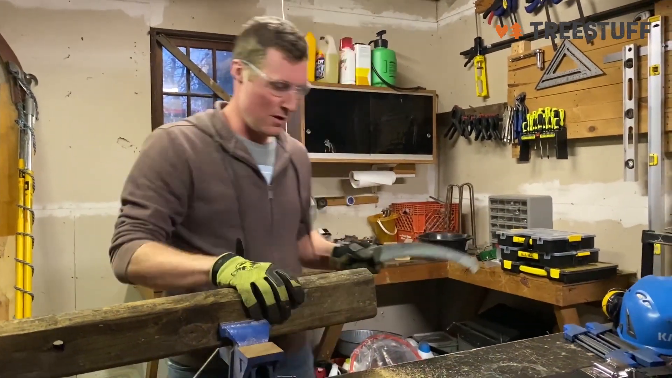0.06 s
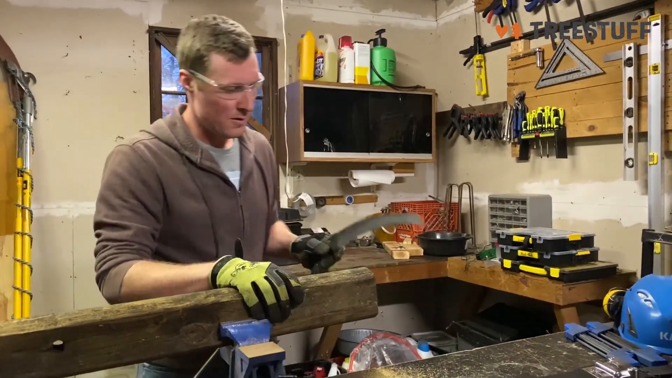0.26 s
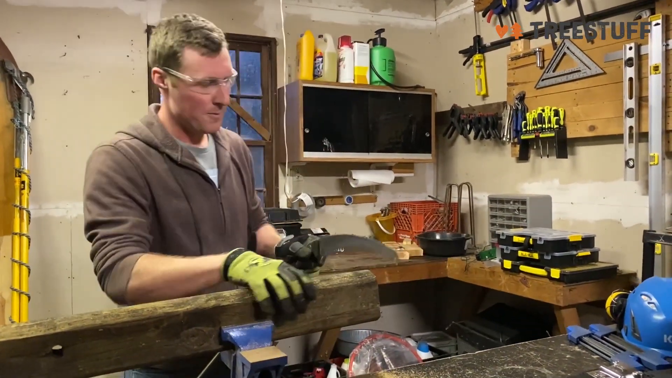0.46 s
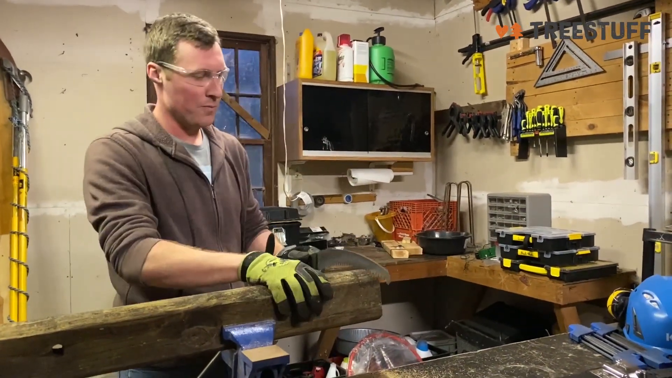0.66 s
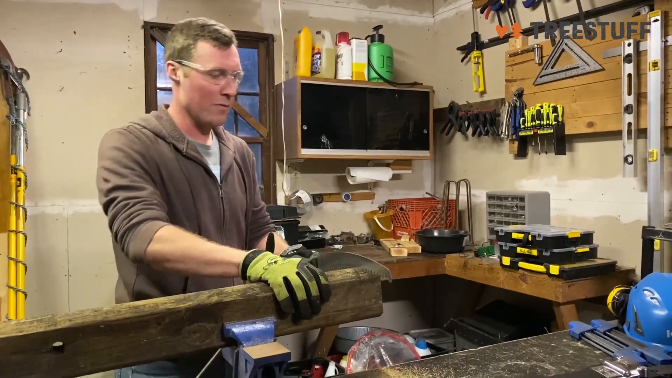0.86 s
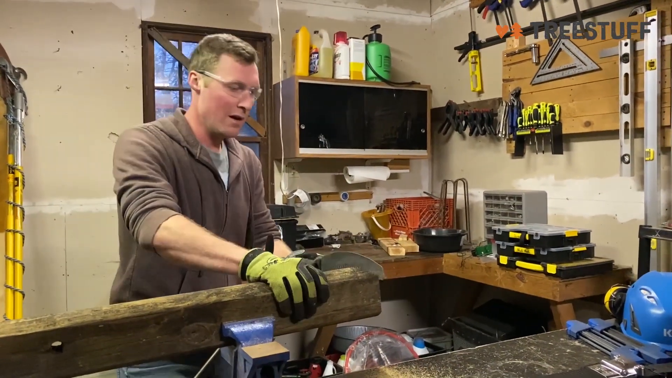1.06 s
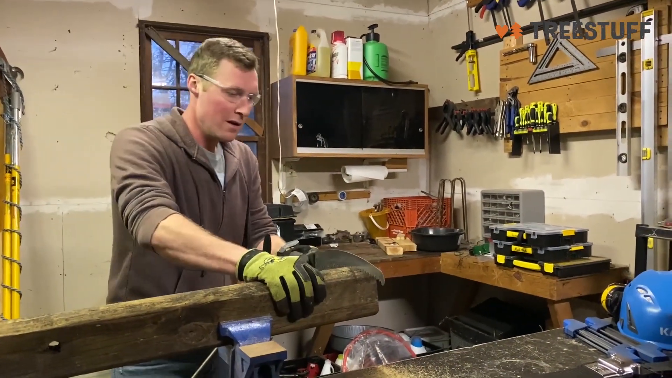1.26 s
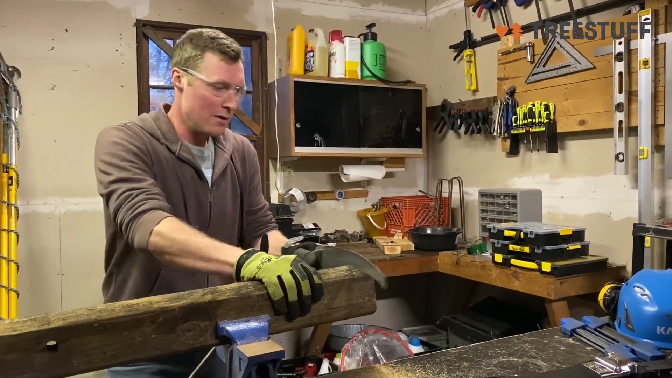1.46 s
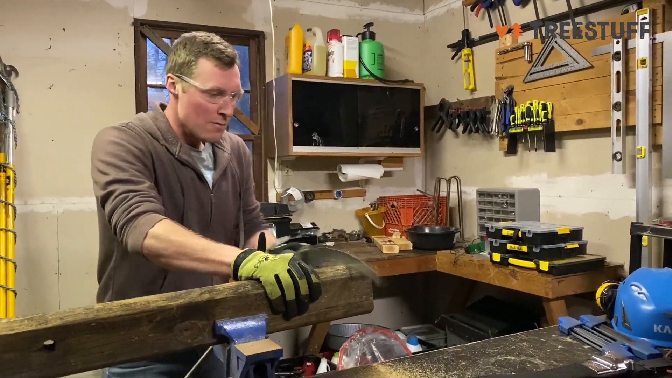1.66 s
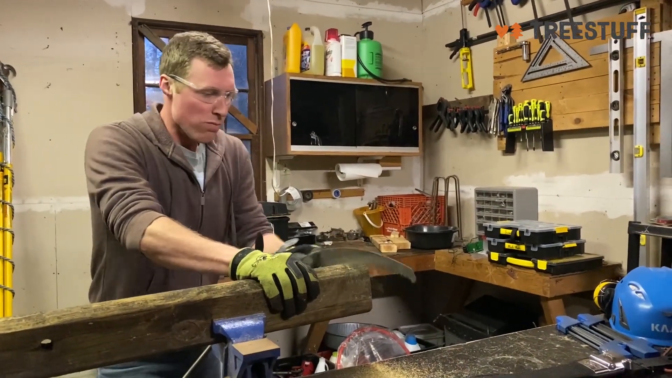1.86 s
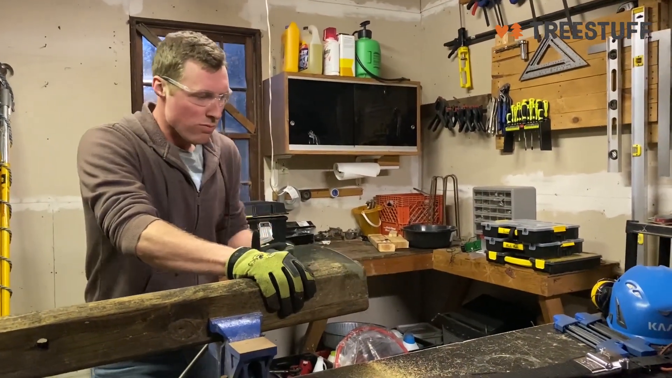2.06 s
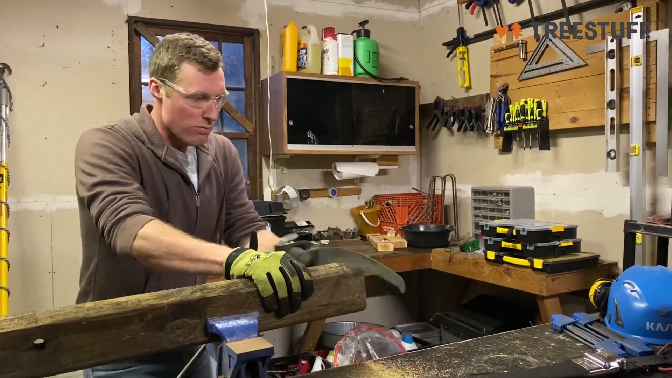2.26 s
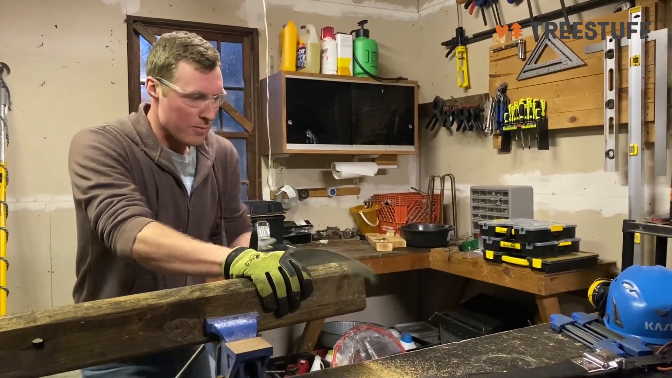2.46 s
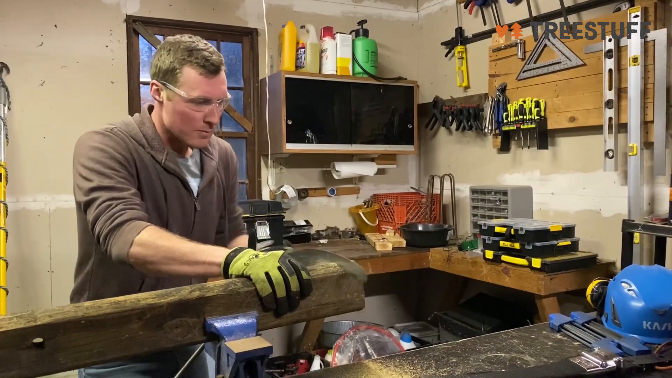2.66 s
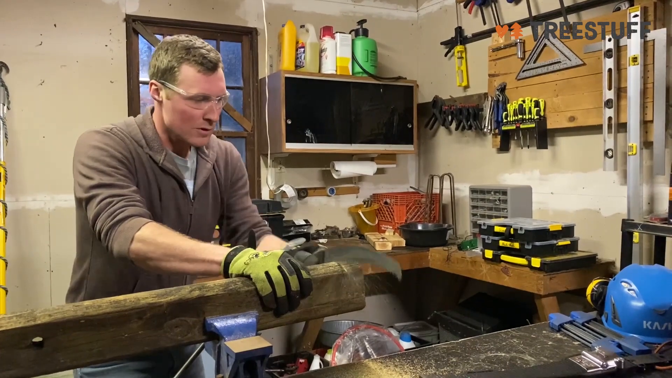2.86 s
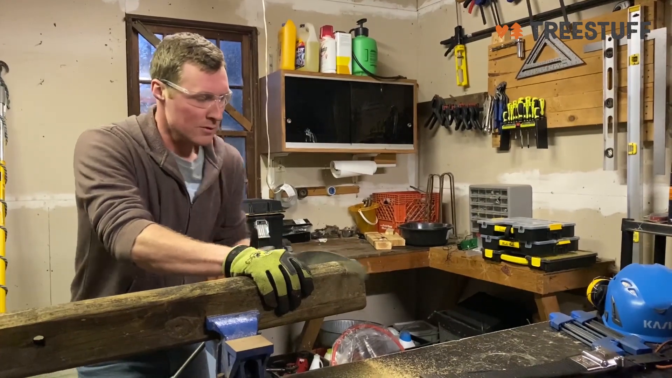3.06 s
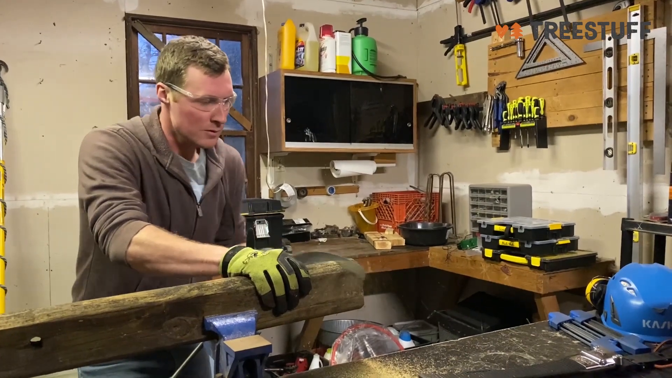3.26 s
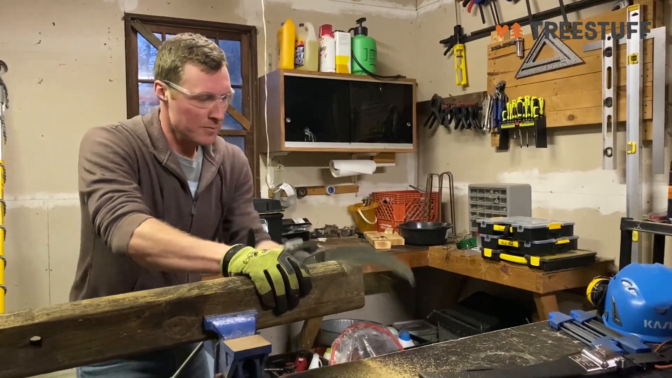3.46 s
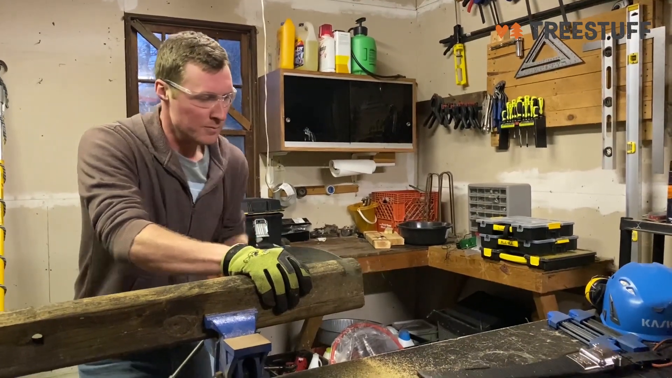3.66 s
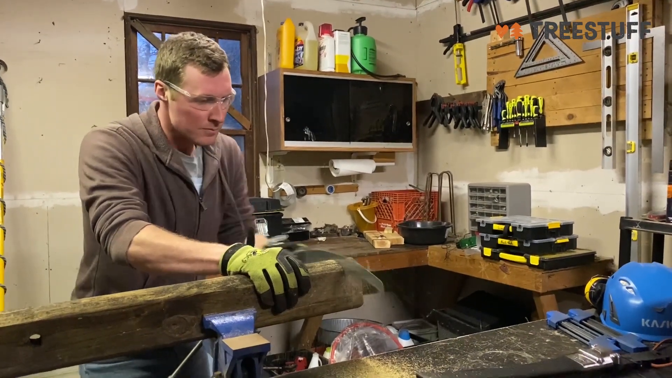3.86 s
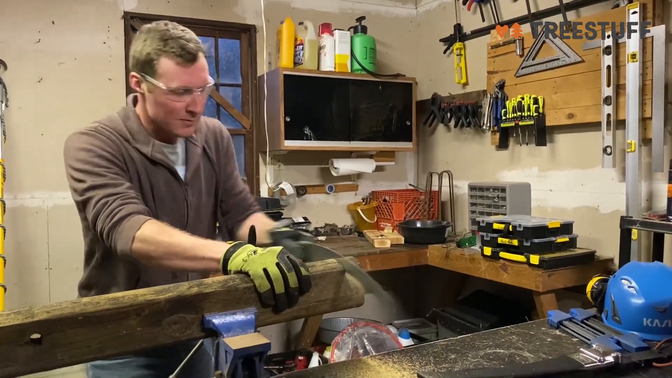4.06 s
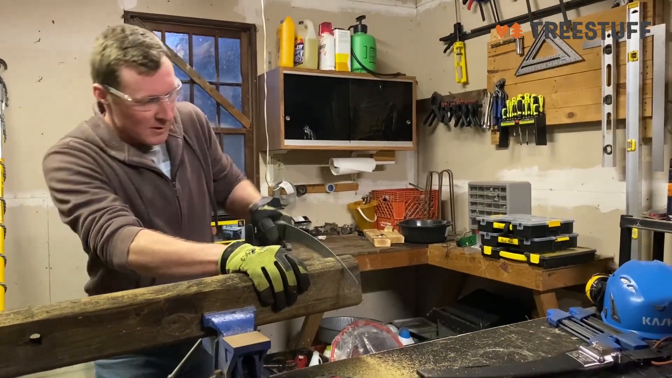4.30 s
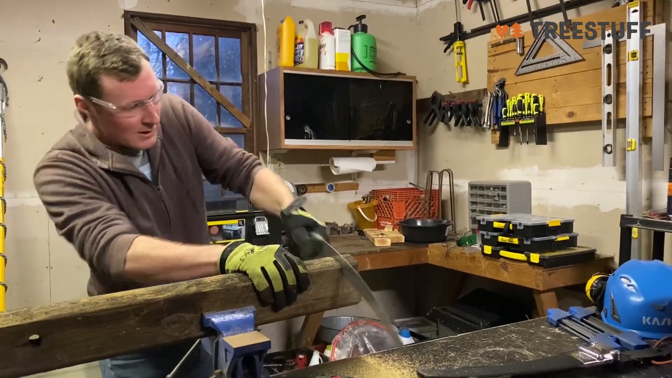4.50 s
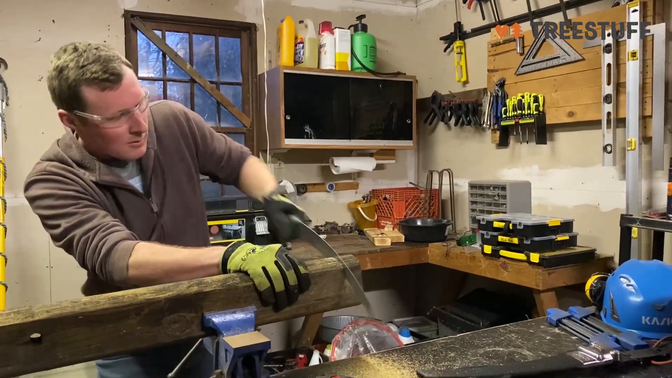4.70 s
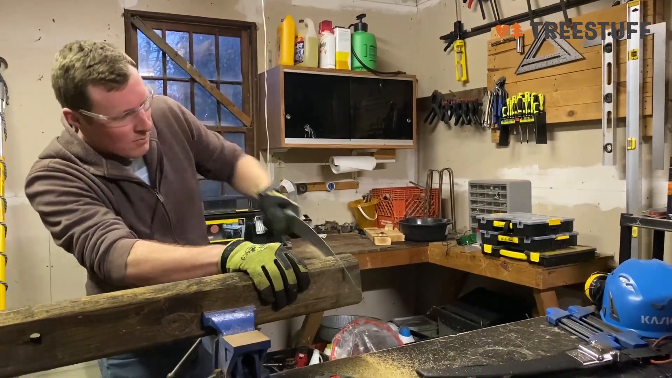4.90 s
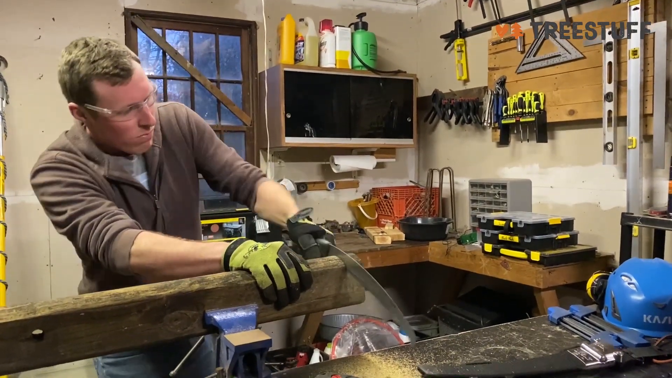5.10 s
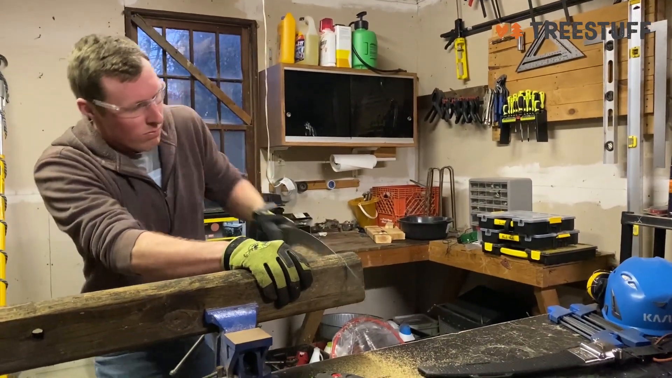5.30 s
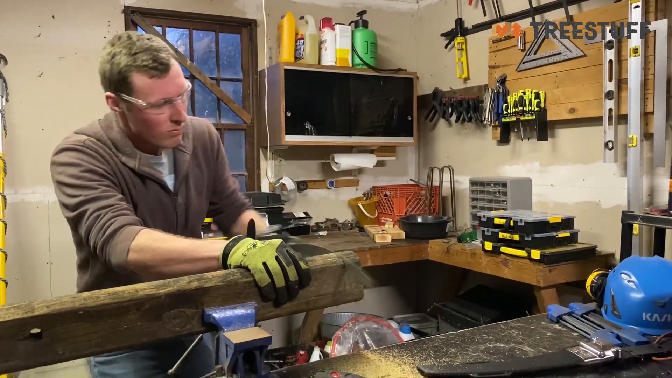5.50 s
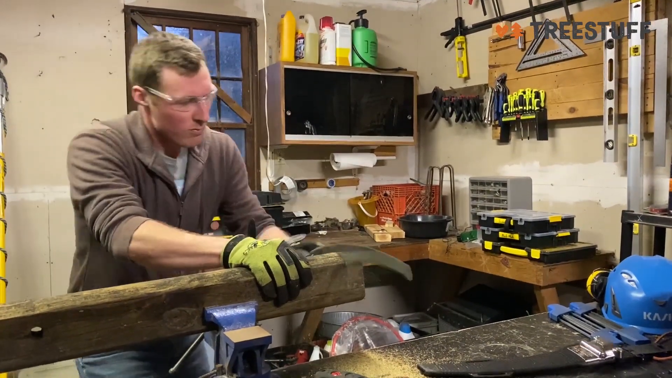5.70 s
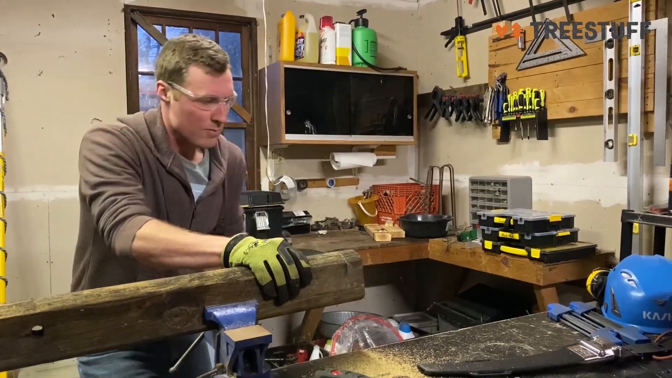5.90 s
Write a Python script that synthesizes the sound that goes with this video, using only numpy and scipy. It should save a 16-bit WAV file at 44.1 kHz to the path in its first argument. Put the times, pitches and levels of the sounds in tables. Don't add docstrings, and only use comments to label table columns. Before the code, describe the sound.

Brief glove rustle and a woody clunk, then quick, steady hand-saw strokes, gritty and hissing, with a chattering beam and jolting bench.

```python
import sys
import numpy as np
from scipy import signal
from scipy.fft import rfft, irfft, next_fast_len
from scipy.io import wavfile
from scipy.ndimage import uniform_filter1d, minimum_filter1d

SR = 44100
rng = np.random.default_rng(int(sys.argv[2]) if len(sys.argv) > 2 else 0)


def generate_wav(sig):
    pcm = np.round(np.clip(np.atleast_2d(sig).T, -1, 1) * 32767).astype(np.int16)
    wavfile.write(sys.argv[1], SR, pcm)


def gain_from_db(level_db):
    decades = np.asarray(level_db, float) / 20
    return 10 ** decades


N = 261954
STEP_SAMPLES = 16

# freq_hz, density_db_per_hz
AIR = [(15, -35), (30, -10), (70, 4.5), (195, -16.5), (476, -14), (1160, -23), (4000, -29.5), (8000, -42),
       (16000, -47)]
AIR_DB = -47.5
# freq_hz, rms_db
HUM = [(120, -61), (359, -66), (479, -59.5), (720, -65.5), (840, -69)]

# time_s, hold_s, level_db, top_rel_db, low_rel_db
BRUSHES = [
    (0.0, 0.0056, -45, -12.5, 0),
    (0.129, .005, -44.5, -14.5, -2.5),
    (0.257, 0.05, -49, -7.5, -0.5),
    (0.542, 0.019, -45, -25, -7),
    (0.63, 0.06, -44, -18.5, -8),
    (1.088, 0.028, -65, -2, -16),
    (1.366, 0.11, -65, -38, 10),
]
# time_s, hold_s, level_db, top_rel_db, low_rel_db
SCUFFS = [
    (0.384, 0.027, -50.5, 2, -2),
    (0.483, 0.045, -45.5, -36, -18),
    (0.805, 0.036, -54, -4, 12),
    (1.167, 0.023, -46, -13, -1),
    (1.263, 0.0053, -41, -14, 0),
    (1.496, 0.023, -64, -13, 26),
]
BRUSH_RISE_FALL_DB_PER_S, SCUFF_RISE_FALL_DB_PER_S = (300, 244), (1196, 167)
# freq_hz, density_db_per_hz
CLOTH = [(590, -50), (1000, 3.5), (1340, 2.5), (1780, 3.5), (2790, 5.5), (4200, 0), (8000, -15),
         (10400, -22), (17600, -120)]

# time_s, peak_db, pitch_hz, crack_rel_db
TICKS = [
    (.1354, -25, 3300, -30),
    (.4804, -17, 3500, -28),
    (.487, -20, 3300, -32),
    (.5014, -23, 3000, -32),
    (.8026, -32, 1760, 0),
    (.9677, -60, 1680, 29),
    (1.258, -28, 1900, -14),
    (1.2608, -29, 2240, -16),
]
# freq_hz, density_db_per_hz
CRACK = [(4500, -24), (7500, -3), (16000, -4)]

# time_s, peak_db, hardness_db
KNOCKS = [
    (.803, -7.5, -23),
    (0.815, -5.5, -32),
    (.836, -10, -39),
    (.88, -17, -28),
    (1.257, -25.5, 13.5),
    (1.268, -48, 27),
    (1.506, -18, -26),
]
# freq_hz, width_hz, level_db
KNOCK = [(225, 45, -10), (305, 12, -7.5), (352, 23, -5), (400, 24, -3), (520, 110, -18.5), (636, 33, -25),
         (740, 33, -30)]

# time_s, peak_db, bright_db
CATCHES = [(1.494, -43, -4), (1.502, -48, -6), (1.526, -31, -4), (1.549, -30, -4), (1.669, -30, 4),
           (2.0198, -25, 13), (2.0248, -24, 2), (2.305, -30, 2), (2.348, -27, 5), (2.3643, -25, 6),
           (3.288, -24, 0), (3.612, -25, 0), (3.931, -24, 2), (4.641, -23, -2), (4.9085, -17, -2),
           (5.139, -24, 3)]
# freq_hz, width_hz, level_db
BEAM = [(150, 48, -10.5), (217.7, 38.7, -1.5), (244, 43, -3), (291.8, 13.6, -6.5), (322.4, 12, -5.5),
        (357, 33.5, -4.5), (403.3, 33, 1.5), (413.9, 25.6, 0.5), (527, 43, -7.5), (622, 73, -9.5),
        (703, 30, -14)]
BENCH = [(66.4, 24, -17), (89, 35, 1.5), (118.7, 7.7, -6.5)]
BLADE = [(1140, 180, 10), (1260, 71, -8), (1372, 13, -19), (1608, 36, 1), (1960, 30, 3.5), (2560, 100, 8),
         (3055, 57, 8), (3400, 100, 6.5), (4620, 450, 8)]

# start_s, length_s, first_hz, last_hz, level_db
SINGS = [(1.53, 0.043, 267, 307, -15), (1.547, 0.082, 404.6, 305, -16), (1.581, 0.044, 218, 224, -13),
         (1.646, 0.028, 321, 334, -25), (1.722, 0.049, 277, 316.4, -18), (1.924, 0.061, 320, 377, -16.5),
         (1.931, 0.082, 220.6, 216, -18), (2.057, 0.12, 253, 237.4, -20.5), (2.06, 0.049, 322, 307, -18),
         (2.239, 0.073, 243, 249, -15), (2.254, 0.037, 379, 350, -13.5), (2.557, 0.031, 396, 400, -17.0),
         (2.566, 0.099, 303.5, 303.5, -13.5), (2.763, 0.047, 307, 298, -18.5),
         (2.865, 0.041, 214, 240, -17), (2.894, 0.062, 305, 331.5, -15.5), (3.159, 0.037, 226, 248, -19.5),
         (3.18, 0.049, 362.6, 388, -14), (3.479, 0.031, 304, 372, -10.5), (3.524, 0.041, 409, 399, -15),
         (3.688, 0.052, 383, 408, -19.5), (3.746, 0.1, 316, 354, -23), (3.846, 0.035, 427, 392, -15.5),
         (3.936, 0.05, 330, 303, -18.5), (3.987, 0.033, 382, 386, -19), (4.149, 0.081, 355.6, 407, -13),
         (4.26, 0.035, 362, 394.4, -16), (4.31, 0.057, 340, 298.3, -20), (4.474, 0.12, 330.7, 405.5, -17),
         (4.6, 0.033, 234.4, 218, -21), (4.632, 0.066, 297, 230, -18), (4.646, 0.068, 301, 324, -12.5),
         (4.834, 0.039, 398.3, 355, -21), (4.966, 0.096, 368, 400.6, -18.5),
         (4.992, 0.075, 312.7, 309, -20.5), (5.237, 0.13, 386.8, 395, -18.5), (5.264, 0.092, 375, 404, -26),
         (5.715, 0.027, 216.3, 214, -16.5), (5.723, 0.04, 306.8, 276, -19.5),
         (5.731, 0.11, 300.4, 309.7, -23)]
# start_s,
# length_s, pitch_hz, level_db
DRONES = [(1.687, 0.061, 91.3, -19.5), (1.76, 0.071, 525, -22), (1.95, 0.043, 150, -23),
          (2.075, 0.064, 526, -22), (2.242, 0.043, 535, -17), (2.41, 0.022, 545, -21),
          (2.59, 0.048, 150, -23), (2.726, 0.038, 691, -17.5), (2.751, 0.075, 546, -16.5),
          (2.774, 0.084, 698, -22), (2.856, 0.028, 538, -28), (2.89, 0.084, 154.4, -24),
          (3.016, 0.081, 78.5, -17), (3.059, 0.058, 698, -18.5), (3.195, 0.05, 150, -24),
          (3.306, 0.066, 90, -21), (3.344, 0.038, 565, -23), (3.407, 0.065, 83.9, -27),
          (3.48, 0.027, 544, -15.5), (3.49, .045, 156.7, -21), (3.625, 0.053, 85.7, -24),
          (3.799, 0.079, 548, -23), (4.431, 0.13, 160.7, -25.5), (4.435, 0.027, 85.6, -25.5),
          (4.435, 0.058, 528, -18), (4.597, 0.058, 90.1, -27.5), (4.799, 0.038, 152.7, -23.5),
          (4.921, .045, 86.2, -26), (5.103, .04, 94.8, -28), (5.111, 0.083, 160.8, -22),
          (5.252, 0.048, 96, -21), (5.263, 0.058, 538, -17.5), (5.554, 0.067, 76.4, -28),
          (5.727, .067, 155, -35), (5.864, .06, 87.5, -24), (2.415, 0.057, 305, -25),
          (2.597, 0.1, 394.6, -19.5), (3.021, 0.089, 386, -19), (3.238, 0.042, 400, -19),
          (3.371, 0.064, 381.7, -19), (3.622, 0.058, 303, -23), (3.957, 0.06, 226, -17),
          (4.818, 0.061, 301.7, -27), (5.112, 0.029, 211, -30), (5.432, 0.069, 352.2, -20.5),
          (5.507, 0.1, 389, -25), (5.544, 0.059, 322.4, -18.5), (5.625, 0.065, 327.7, -16.5),
          (5.75, 0.09, 388.2, -18), (5.876, 0.079, 320, -13)]
# start_s, length_s, pitch_hz, level_db
SQUEAKS = [
    (2.462, .004, 4500, -29),
    (5.139, .001, 5700, -19),
    (5.139, .001, 15300, -19),
    (5.148, .003, 4400, -25),
    (5.16, .003, 4200, -27),
    (5.1705, .001, 14900, -19),
    (5.177, .005, 15000, -24),
]
SING_EDGE_S, SQUEAK_EDGE_S, SING_DB, DRONE_DB = .01197, .002, 1, -1.9

# start_s, force_db, hiss_db, top_speed_teeth_per_s, top_place_0_1
PUSHES = [(1.472, -16, -36, 300, .45), (1.854, -15.5, -30.5, 225, .4), (2.18, -15, -30.5, 270, .46),
          (2.517, -17.5, -30, 303, .5), (2.845, -15.5, -29, 335, .5), (3.135, -20, -26, 410, .6),
          (3.434, -17.5, -28.5, 430, .55), (3.759, -15.5, -24.5, 370, .45), (4.082, -16.5, -29, 420, .55),
          (4.418, -15, -31, 380, .55), (4.755, -15.5, -29, 380, .59), (5.071, -14.5, -31.5, 330, .55),
          (5.396, -15.5, -31, 355, .5), (5.688, -15, -31.5, 340, .6)]
# start_s, force_db, hiss_db, top_speed_teeth_per_s, top_place_0_1
PULLS = [(1.661, -14.5, -28, 305, 0.27), (2.005, -16.5, -31, 326, 0.55), (2.336, -19.5, -29.5, 332, 0.49),
         (2.666, -19, -29, 280, 0.45), (2.978, -13.5, -26, 320, 0.57), (3.273, -18, -25.5, 364, 0.47),
         (3.579, -16.5, -27, 355, 0.43), (3.907, -16.5, -29.5, 400, 0.36), (4.238, -16.5, -30.5, 340, 0.51),
         (4.576, -16, -28.5, 322, 0.3), (4.888, -14.5, -30.5, 392, 0.5), (5.216, -16.5, -27, 380, .38),
         (5.523, -17.5, -29, 284, 0.32), (5.822, -21.5, -26.5, 420, 0.5)]
LAST_TURN_S = 5.99
FIRST_BITE_S, START_DB_PER_S = 1.54, 918
FORCE_LAG_S, BITE_LAG_S = (.008, .024), (.0024, .0044)
# offset_db, start_dip_db, end_dip_db, top_shift_0_1
FORCE_SWELL = [(1.5, 1.5, -3.5, 0), (1.5, 4.5, -8.5, 0.26)]
BITE_SWELL = [(-22.5, -3.5, -5.5, -0.1), (-19.5, -9.5, -9, -0.022)]
DUST_SWELL = [(1.5, -15.5, -9.5, -0.012), (1.5, -9.5, -18, -0.0086)]
BODY_SWELL = [(-33.5, -7, -7, 0), (-30, -5, -10, 0.19)]
SPEED = [(.6, .85, .1), (.8, .75, .1)]
EVEN = [(0.33, 0.073), (0.32, 0.45)]
# time_s, dip_db
HALTS = [(1.685, -4.5), (1.84, -3.5), (2.0, -5), (2.185, -4), (3.745, -3.5), (4.418, -2), (4.575, -5.5),
         (4.761, -5), (5.076, -5), (5.223, -3.5), (5.525, -3.5), (5.69, -2), (5.83, -2)]
HALT_S = .029
# time_s, jump_db
GRIPS = [(1.696, 2.5), (1.8819, 2), (2.0196, -4), (2.365, 6.5), (2.552, 3), (2.609, 6), (2.7, 3.5), (3, 4),
         (3.2053, 5.5), (3.288, 10.5), (3.3522, 3), (3.4642, 3), (3.516, 3), (3.59, 5.5), (3.781, -3.5),
         (3.798, 4.5), (3.916, 9.5), (3.931, 5), (4.2519, 5.5), (4.266, 6), (4.4486, 4), (4.471, 6),
         (4.595, 5), (4.9082, 7.5), (5.138, 0.5), (5.1702, 7), (5.2418, 2), (5.5545, 0.5), (5.73, 0),
         (5.865, -0.5)]
GRIP_FADE_S, GRIP_SLACK_S, GRIP_SLACK_SHARE, GRIP_BITE_SHARE = .012, .048, .55, .94
BITE_FOLLOWS_SHARE, USUAL_HISS_DB = .58, -27

# time_s, peak_db
JOLTS = [(1.56, -28), (1.715, -12.5), (1.91, -25), (2.064, -18.5), (2.22, -25.5), (2.331, -25), (2.54, -42),
         (2.74, -25), (2.89, -23), (3.038, -19), (3.332, -25), (3.508, -40), (3.648, -25), (3.821, -18.5),
         (3.957, -32), (4.124, -33), (4.272, -29), (4.451, -34), (4.623, -23), (4.781, -24), (4.941, -29),
         (5.118, -25), (5.279, -20), (5.437, -43), (5.586, -22.5), (5.709, -44), (5.891, -35)]
JOLT_RISE_DB_PER_S, JOLT_FALL_DB_PER_S, ROCKING_DB = 310, 172, -31
THUD_DB, THUD_BEAM_DB, THUD_TOP_DB, THUD_LEAD_S = 32.5, 44, -37, .015
BLADE_GLIDE_SHARE = .055
# freq_hz, density_db_per_hz
RASP = [(260, -45), (450, -1), (533, -6), (832, -3.5), (1590, -7.5), (1820, -14), (2980, -13),
        (3880, -19.5), (8000, -29.5), (10400, -27.5), (17600, -120)]
HISS = [(3000, -4.5), (6000, -1), (8000, -1.5), (10000, -7.5), (12000, -1.5), (14000, 0.5), (16000, -2.5)]
KERF = [(500, -21.5), (750, -4), (1300, -3.5), (1900, -24)]
# time_s, hold_s, peak_db, rise_db_per_s
GLANCES = [(1.898, 0.0066, -40, 253), (2.022, 0.035, -26.5, 3000), (2.223, 0.011, -44, 250),
           (2.36, 0.024, -41, 2000), (3.24, 0.011, -40, 272), (1.783, 0.018, -44, 250),
           (1.608, 0.036, -51, 248.5), (4.514, 0.01, -32.5, 250), (4.832, 0.011, -33.5, 254),
           (4.93, 0.018, -31, 1500), (5.128, 0.04, -23.5, 1502), (5.461, 0.011, -27.5, 245),
           (5.775, 0.0092, -30.5, 250)]
GLANCE_FALL_DB_PER_S = 402
FINE_HZ, FINE_POWER, FINE_EVEN_DB = 9000, .068, -24

# freq_hz, share_0_1
DIRECT = [(60, .99), (200, .88), (400, .72), (800, .38), (1500, .3), (2700, .52), (4500, .52), (5800, .25),
          (6500, .8)]
# freq_hz, level_db
LEFT_DB = [(60, 3.5), (140, 2), (500, 2.5), (800, 1.5), (1500, 2), (3000, 4), (4200, 5), (6400, 2.5)]
# freq_hz, phase_rad
LEAD_RAD = [(20, 0), (150, 0), (450, -.35), (1000, .2), (2800, .9), (4500, .35), (6500, .4)]
PORT_HZ, PORT_TURN_HZ, TURN_AT_HZ = 6900, 4150, 7000
# freq_hz, t60_s
SHOP_T60_S = [(80, 0.067), (300, 0.42), (1500, 0.11), (5000, 0.3), (12000, 0.31)]

# freq_hz, level_db
MICROPHONE = [(20, -24), (40, -8), (58, 0), (15900, 0), (16700, -14), (16800, -80)]
LIMIT, LIMIT_SHARE = .59, .47
# low_hz, high_hz
SUM_LOST = [(8950, 9300), (13250, 13500)]
DIFFERENCE_LOST = [(6800, 7350), (10650, 11600)]
SUM_FLANKS = [(8380, 8950), (9300, 9620), (13000, 13250), (13500, 13700)]
# start_s, end_s
BOTH_KEPT = [(.8, .81), (.965, .975), (2.018, 2.03), (.475, .49), (1.49, 1.56), (1.665, 1.68), (2.01, 2.05),
             (2.29, 2.38), (3.57, 3.62), (3.92, 3.94), (4.57, 4.6), (4.9, 4.93)]
SUM_TOP_HZ, DIFFERENCE_TOP_HZ, SWELL_DB, SWELL_S = 15950, 15100, 3.5, .035


def evened(x):
    return x / np.sqrt(np.mean(x ** 2) + 1e-20)


def matched(x, model):
    return x * np.sqrt(np.mean(model ** 2) / np.mean(x ** 2))


def read(points, hz):
    f, value = np.transpose(points)
    return np.interp(np.log(hz + 1), np.log(f + 1), value)


def colour(x, points):
    half = np.maximum(read(points, np.fft.rfftfreq(4096, 1 / SR)), -100) * np.log(10) / 20
    log_gain = np.r_[half, half[-2:0:-1]]
    taps = np.fft.ifft(np.exp(np.conj(signal.hilbert(log_gain)))).real
    return signal.oaconvolve(x, taps[:2048])[:N]


def ring(x, modes):
    t = np.arange(SR // 4) / SR
    body = np.zeros(len(t))
    for k, (hz, width_hz, db) in enumerate(modes):
        decay = np.sqrt(width_hz) * np.exp(-np.pi * width_hz * t)
        body += (-1) ** k * gain_from_db(db) * decay * np.sin(2 * np.pi * hz * t)
    return signal.oaconvolve(x, body / np.linalg.norm(body))[:N]


def clicks(times_s, sizes):
    return np.bincount(np.round(np.asarray(times_s) * SR).astype(int), sizes, N + 1)[:N]


def burst(t60_s, tail_db):
    t = np.arange(1500) / SR
    envelope = gain_from_db(-60 * t / t60_s) + gain_from_db(tail_db - 60 * t / .031)
    return envelope * rng.standard_normal(len(t))


def tears(per_s, spread_db):
    size = gain_from_db(spread_db * np.minimum(rng.exponential(1, N), 4)) * rng.standard_normal(N)
    return evened(size * (rng.random(N) < per_s / SR))


def drift(size):
    return evened(uniform_filter1d(uniform_filter1d(rng.standard_normal(N), size), size))


def patchy(x, patch_db):
    z = signal.stft(x, nperseg=512, noverlap=384)[2]
    field = uniform_filter1d(rng.standard_normal(z.T.shape), size=14, axis=0)
    field = evened(uniform_filter1d(field, size=4, axis=1))
    return signal.istft(z * gain_from_db(patch_db * field.T), nperseg=512, noverlap=384)[1][:N]


def moments():
    return np.arange(N // STEP_SAMPLES + 2) * STEP_SAMPLES / SR


def fill(control):
    return np.interp(np.arange(N) / SR, moments(), control)


def peak(s, hold_s, rise_db_per_s, fall_db_per_s):
    t = moments()
    return gain_from_db(-rise_db_per_s * np.maximum(s - t, 0) - fall_db_per_s * np.maximum(t - s - hold_s, 0))


def air():
    return gain_from_db(AIR_DB + 2.0 * drift(size=3000)) * evened(colour(rng.standard_normal(N), AIR))


def lamps():
    t = np.arange(N) / SR
    return sum(gain_from_db(db) * np.sqrt(2) * np.sin(2 * np.pi * (hz * t + rng.random())) for hz, db in HUM)


def rubbing():
    rows = [(row, BRUSH_RISE_FALL_DB_PER_S) for row in BRUSHES]
    rows += [(row, SCUFF_RISE_FALL_DB_PER_S) for row in SCUFFS]
    layers = 0
    for (s, hold_s, db, top_db, low_db), rates in rows:
        layers = layers + peak(s, hold_s, *rates) * gain_from_db(db + np.array([[0], [top_db], [low_db]]))
    return np.array([fill(layer) for layer in layers])


def cloth():
    rub, top, low = rubbing() * gain_from_db(1.55 * drift(size=200))
    out = rub * evened(colour(tears(8000, 2.6), CLOTH))
    bright = colour(tears(8000, 1.2), [(3000, 2), (9000, 2), (15000, -6)])
    deep = colour(tears(5000, 2.6), [(250, 15.5), (600, 8.0), (1400, -0.5), (2500, -40)])
    out += top * gain_from_db(7.0) * evened(bright) + low * evened(deep)
    return patchy(out, 1.6)


def ticks():
    t = np.arange(300) / SR
    s, peak_db, pitch_hz, crack_db = np.transpose(TICKS)
    out = np.zeros(N)
    for at_s, db, hz in zip(s, peak_db, pitch_hz):
        ping = gain_from_db(-60 * t / .003) * np.sin(2 * np.pi * hz * t)
        out += signal.oaconvolve(clicks([at_s], [gain_from_db(db)]), ping)[:N]
    cracks = signal.oaconvolve(clicks(s, gain_from_db(peak_db + crack_db)), burst(.01, -24))[:N]
    out += colour(cracks, CRACK)
    late = np.r_[np.zeros(3), out[:-3]]
    return np.array([gain_from_db(2) * late, gain_from_db(-1) * out])


def knocks():
    s, peak_db, hard_db = np.transpose(KNOCKS)
    soft = signal.oaconvolve(clicks(s, gain_from_db(peak_db)), signal.windows.hann(40))[:N]
    hard = clicks(s, gain_from_db(peak_db + hard_db))
    # freq_hz, width_hz, level_db
    upper = [(640, 100, 9), (785, 50, -9), (1180, 60, -11), (1860, 100, 3), (2280, 140, 1)]
    return gain_from_db(-11.5) * ring(soft, KNOCK) + gain_from_db(7.0) * ring(hard, upper)


def catches():
    s, peak_db, bright_db = np.transpose(CATCHES)
    crack = burst(.008, -20)
    dull = signal.oaconvolve(clicks(s, gain_from_db(peak_db)), crack)[:N]
    bright = signal.oaconvolve(clicks(s, gain_from_db(peak_db + bright_db)), crack)[:N]
    return gain_from_db(5) * ring(dull, BLADE) + gain_from_db(7) * colour(bright, CRACK)


def singing():
    out, waver, flutter = np.zeros(N), 1 + .026 * drift(size=150), gain_from_db(2.7 * drift(size=200))
    rows = [(s, span, a, b, db + SING_DB, SING_EDGE_S) for s, span, a, b, db in SINGS]
    rows += [(s, span, a, a, db + DRONE_DB, SING_EDGE_S) for s, span, a, db in DRONES]
    rows += [(s, span, a, a, db, SQUEAK_EDGE_S) for s, span, a, db in SQUEAKS]
    for s, span_s, first_hz, last_hz, db, edge_s in rows:
        at = np.arange(round((s - edge_s) * SR), min(round((s + span_s + edge_s) * SR), N))
        hz = np.interp(at / SR, [s, s + .602 * span_s], [first_hz, last_hz]) * waver[at]
        tone = np.cos(2 * np.pi * (np.cumsum(hz) / SR + rng.random()))
        out[at] += gain_from_db(db) * np.sqrt(2) * np.sin(np.pi * np.linspace(0, 1, len(at))) * tone
    return out * flutter


def stroke(shifts, lag_s):
    rows = np.array([row for pair in zip(PUSHES, PULLS) for row in pair])
    turns_s = np.r_[rows[:, 0] + np.resize(lag_s, len(rows)), LAST_TURN_S]
    place = np.interp(moments(), turns_s, np.arange(len(turns_s)))
    k = np.minimum(place.astype(int), len(rows) - 1)
    top = np.clip(rows[k, 4] + np.asarray(shifts)[k % 2], .1, .9)
    u = place - k
    early = u < top
    arch = np.sin(np.pi / 2 * np.where(early, u / top, (1 - u) / (1 - top)))
    return rows[k], k % 2, arch, early


def swell(rules, column_db, lag_s):
    offset_db, start_db, end_db, shift = np.transpose(rules)
    rows, pull, arch, early = stroke(shift, lag_s)
    db = column_db(rows) + offset_db[pull]
    db += np.where(early, start_db[pull], end_db[pull]) * (1 - arch)
    db += sum(dip_db * np.exp(-((moments() - s) / HALT_S) ** 2) for s, dip_db in HALTS)
    return gain_from_db(uniform_filter1d(db, size=12)) * peak(FIRST_BITE_S, 9, START_DB_PER_S, 0)


def teeth():
    start, end, shift = np.transpose(SPEED)
    rows, pull, arch, early = stroke(shift, FORCE_LAG_S)
    slow = np.where(early, start[pull], end[pull])
    rate = rows[:, 3] * (slow + (1 - slow) * arch)
    fast, turn = np.transpose(EVEN)
    even = turn[pull] + (fast[pull] - turn[pull]) * arch
    return [fill(uniform_filter1d(v, size=38)) for v in (rate, even)]


def grip():
    t = moments()
    db = np.zeros(len(t))
    for s, jump_db in GRIPS:
        fade = np.exp(-abs(t - s) / GRIP_FADE_S)
        slack = -GRIP_SLACK_SHARE * np.exp(-abs(t - s) / GRIP_SLACK_S)
        db += jump_db * np.where(t >= s, fade, slack)
    return uniform_filter1d(db, size=8)


def glide(x):
    turns_s = np.r_[np.sort([row[0] for row in PUSHES + PULLS]), LAST_TURN_S]
    t = np.arange(N) / SR
    place = np.interp(t, turns_s, np.arange(len(turns_s)))
    late = np.cumsum(-BLADE_GLIDE_SHARE * np.cos(np.pi * place) * (t > turns_s[0]))
    return np.interp(np.arange(N) + late - uniform_filter1d(late, size=SR // 3), np.arange(N), x)


def beam_chatter(turns, even):
    beats = np.cos(2 * np.pi * turns) * gain_from_db(2.4 * drift(size=300)) + .097 * np.cos(4 * np.pi * turns)
    force = fill(swell(FORCE_SWELL, lambda rows: rows[:, 1], FORCE_LAG_S))
    drive = np.sqrt(even) * beats + np.sqrt(1 - even) * 15.3 * tears(3000, 4.36)
    shaken = matched(ring(force * drive, BEAM), force)
    return gain_from_db(-3) * patchy(shaken, 1.25) + gain_from_db(-5.0) * force * even * beats


def bench_jolts():
    sway = gain_from_db(ROCKING_DB) * peak(FIRST_BITE_S, 9, START_DB_PER_S, 0)
    for s, db in JOLTS:
        sway += gain_from_db(db) * peak(s - .02, 0, JOLT_RISE_DB_PER_S, JOLT_FALL_DB_PER_S)
    s, jolt_db = np.transpose(JOLTS)
    blows = clicks(s - THUD_LEAD_S, gain_from_db(np.minimum(jolt_db, THUD_TOP_DB)))
    thuds = signal.oaconvolve(blows, signal.windows.hann(100) / 50)[:N]
    bench = ring(fill(sway) * tears(2000, 1.7) + gain_from_db(THUD_DB) * thuds, BENCH)
    return bench + gain_from_db(THUD_BEAM_DB) * ring(thuds, BEAM)


def torn_fibres(landing):
    bite = swell(BITE_SWELL, lambda rows: BITE_FOLLOWS_SHARE * (rows[:, 2] - USUAL_HISS_DB), BITE_LAG_S)
    fibres = fill(bite * gain_from_db(GRIP_BITE_SHARE * grip())) * evened(landing * tears(7000, 3.27))
    rasp = matched(colour(fibres, RASP), fibres)
    return patchy(gain_from_db(4.5) * rasp + gain_from_db(-3.5) * glide(ring(fibres, BLADE)), 1.04)


def kerf_dust(landing):
    gain = swell(DUST_SWELL, lambda rows: rows[:, 2], 0) * gain_from_db(grip())
    for s, hold_s, db, rise_db_per_s in GLANCES:
        gain += gain_from_db(db) * peak(s, hold_s, rise_db_per_s, GLANCE_FALL_DB_PER_S)
    hiss = fill(gain)
    dust = hiss * evened(landing * patchy(colour(tears(15000, 1.2), HISS), 1.5))
    high_pass = signal.butter(4, FINE_HZ, "high", fs=SR, output="sos")
    fine = signal.sosfiltfilt(high_pass, dust)
    return dust + fine * ((hiss / gain_from_db(FINE_EVEN_DB)) ** FINE_POWER - 1)


def kerf_body(landing):
    gain = fill(swell(BODY_SWELL, lambda rows: 0 * rows[:, 0], 0))
    return gain * evened(colour(landing * tears(3000, 5.0), KERF))


def saw():
    rate, even = teeth()
    turns = np.cumsum(rate * (1 + .0424 * drift(size=200))) / SR
    tooth = gain_from_db(1.0 * rng.standard_normal(4000))[turns.astype(int)]
    landing = .75 + tooth * np.exp(-(turns % 1) / .3)
    landing *= gain_from_db(.45 * drift(size=250))
    wood = kerf_body(landing) + beam_chatter(turns, np.clip(even, 0, 1)) + gain_from_db(-4.5) * bench_jolts()
    return wood + torn_fibres(landing) + gain_from_db(5.0) * kerf_dust(landing)


def echoes(count):
    taps = np.zeros((count, SR // 2))
    at = np.arange(100, SR // 2 - 20, 20) + rng.integers(0, 20, (count, (SR // 2 - 101) // 20))
    np.put_along_axis(taps, at, rng.choice([-1., 1.], at.shape), 1)
    hz, t, z = signal.stft(taps, SR, nperseg=256)
    decay = gain_from_db(-60 * t / read(SHOP_T60_S, hz)[:, None])
    tail = signal.istft(z * decay / np.linalg.norm(decay, axis=1)[:, None], SR, nperseg=256)[1]
    return tail / np.linalg.norm(tail, axis=1)[:, None]


def shop(x, echo):
    size = next_fast_len(N + SR)
    hz = np.fft.rfftfreq(size, 1 / SR)
    low = hz < PORT_HZ
    lead_rad = np.where(low, read(LEAD_RAD, hz), -2 * np.pi * (hz - TURN_AT_HZ) / PORT_TURN_HZ)
    share, side = np.where(low, read(DIRECT, hz), .9), np.array([[.5], [-.5]])
    place = np.arange(N) / SR * 8 % 10
    wet = 0
    for k in range(10):
        distance = abs((place - k + 5) % 10 - 5)
        near = np.cos(np.pi / 2 * np.minimum(distance, 1))
        wet = wet + rfft(x * near, size) * rfft(echoes(count=2), size)
    straight = np.sqrt(share) * np.exp(1j * side * lead_rad) * rfft(x, size)
    ports = straight + echo * np.sqrt(1 - share) * wet
    return irfft(ports * gain_from_db(side * low * read(LEFT_DB, hz)), size)[:, :N]


def scene():
    tick = ticks()
    roomy = shop(air() + cloth() + knocks() + saw(), echo=.79)
    close = shop(.59 * tick[1] + catches() + singing(), echo=.7)
    return roomy + close + tick + lamps()


def within(v, spans):
    return sum(1. * ((v > a) & (v < b)) for a, b in spans)


def limiter(x):
    top = uniform_filter1d(-minimum_filter1d(-abs(x).max(0), size=300), size=300)
    ceiling = .8
    gain = np.minimum(LIMIT / top, 1) ** LIMIT_SHARE
    return ceiling * np.tanh(gain_from_db(1.0) * x * gain / ceiling)


def microphone_and_losses(x):
    left, right = x
    size = next_fast_len(N + SR)
    hz, t = np.fft.rfftfreq(size, 1 / SR), np.arange(N) / SR
    pair = rfft([left + right, left - right], size) * gain_from_db(read(MICROPHONE, hz)) / 2
    weak = np.array([within(hz, SUM_LOST), within(hz, DIFFERENCE_LOST)])
    flanks = np.array([within(hz, SUM_FLANKS), 0 * hz])
    tops = 1. * (hz > np.array([[SUM_TOP_HZ], [DIFFERENCE_TOP_HZ]]))
    side_hiss = irfft(pair[1] * within(hz, SUM_LOST + SUM_FLANKS), size)[:N]
    power = uniform_filter1d(side_hiss ** 2, size=1200) + 1e-12
    swelling = power > gain_from_db(2 * SWELL_DB) * np.roll(power, round(SWELL_S * SR))
    sharp = within(t, BOTH_KEPT)
    parts = [(1 - weak - flanks - tops, 1 + 0 * t), (weak, sharp), (flanks, sharp + swelling),
             (tops, within(t, BOTH_KEPT[:3]))]
    both, apart = sum(uniform_filter1d(np.minimum(kept, 1), size=400) * irfft(pair * band, size)[:, :N]
                      for band, kept in parts)
    return np.array([both + apart, both - apart])


def low_pass(x):
    return signal.sosfilt(signal.butter(12, 16820, fs=SR, output="sos"), x)


def record(dry):
    return low_pass(microphone_and_losses(limiter(dry)))


dry = scene()
out = record(dry)
generate_wav(out)
```